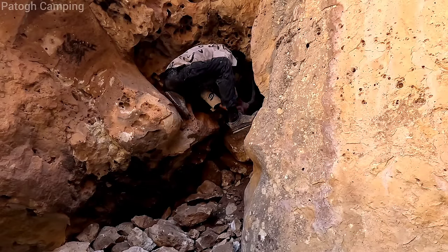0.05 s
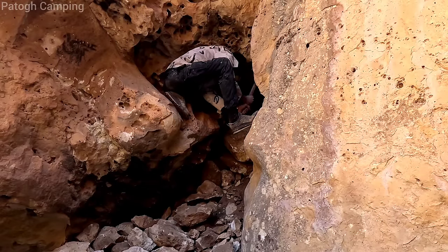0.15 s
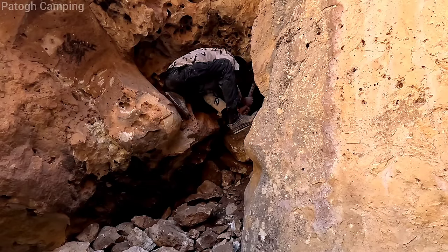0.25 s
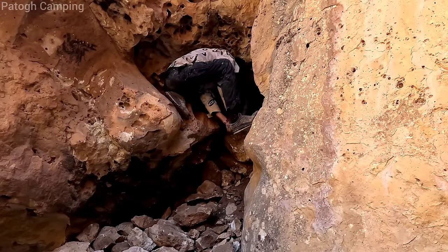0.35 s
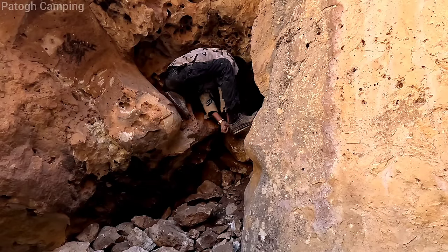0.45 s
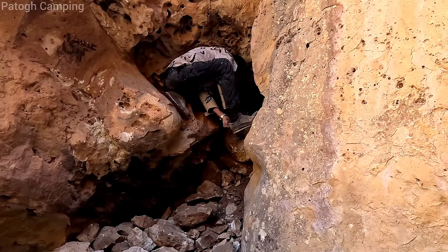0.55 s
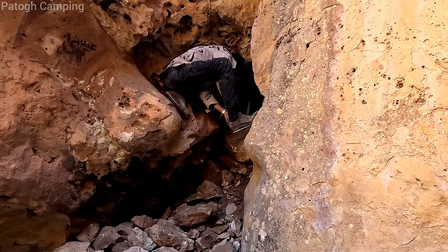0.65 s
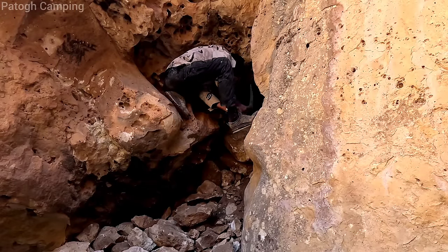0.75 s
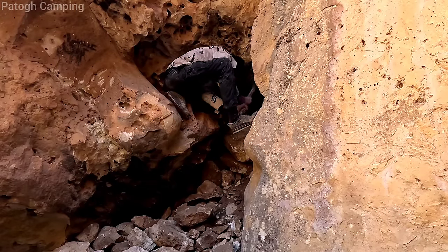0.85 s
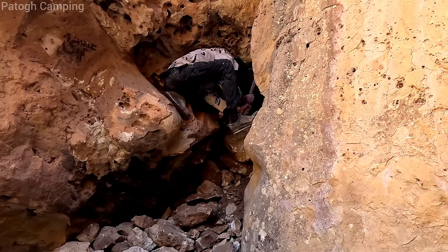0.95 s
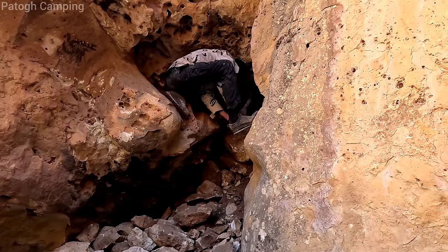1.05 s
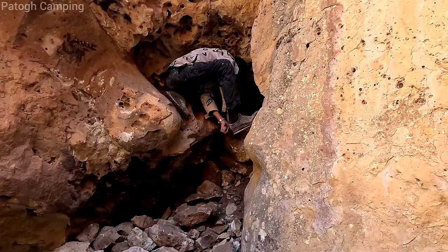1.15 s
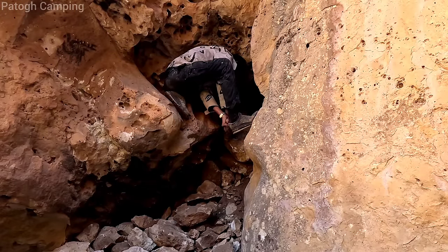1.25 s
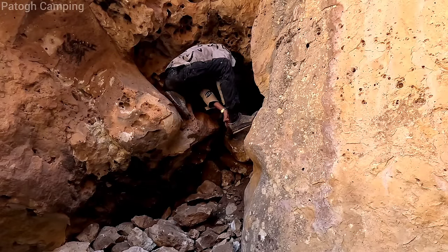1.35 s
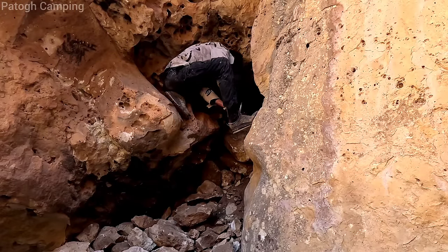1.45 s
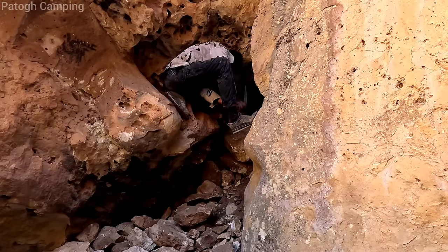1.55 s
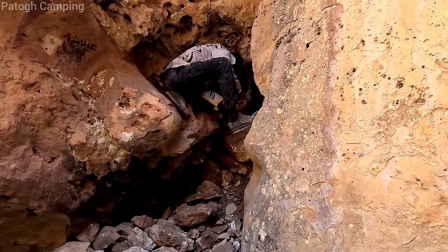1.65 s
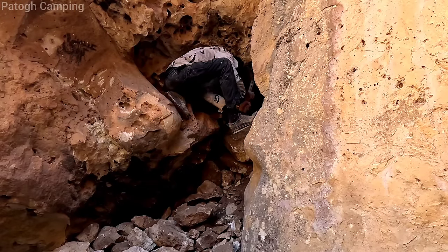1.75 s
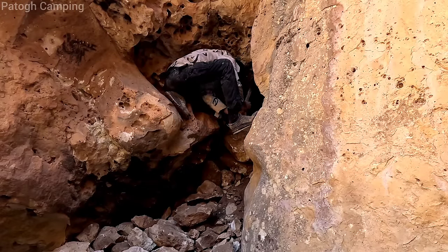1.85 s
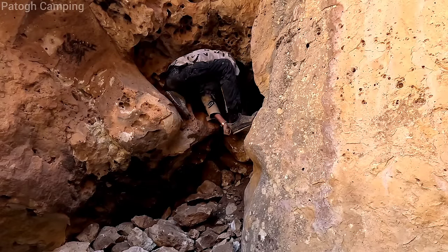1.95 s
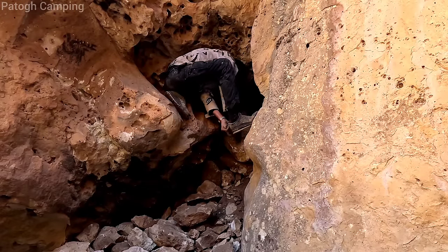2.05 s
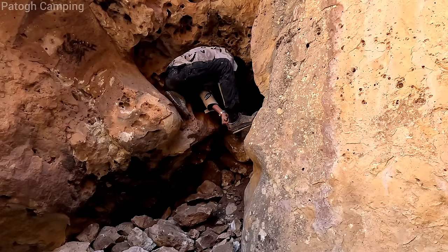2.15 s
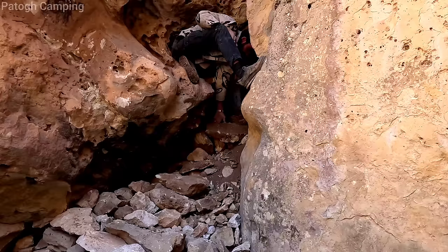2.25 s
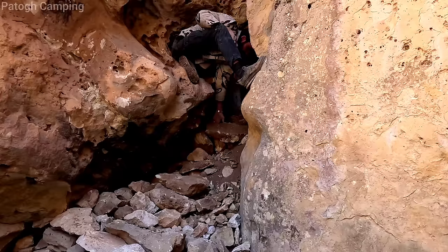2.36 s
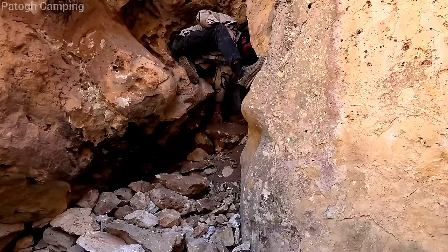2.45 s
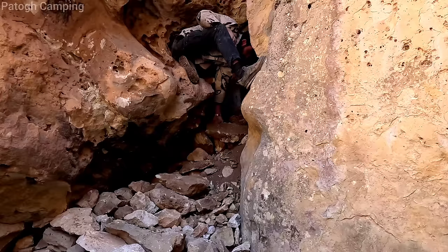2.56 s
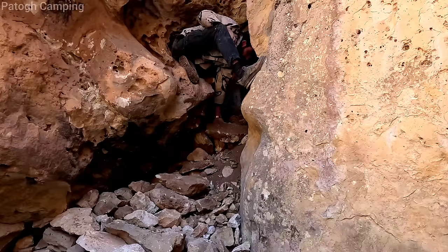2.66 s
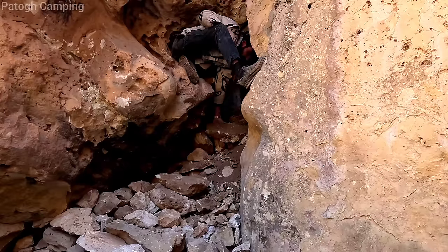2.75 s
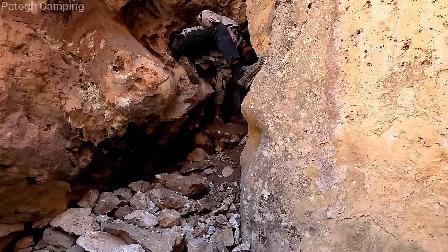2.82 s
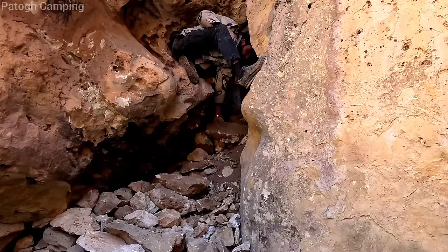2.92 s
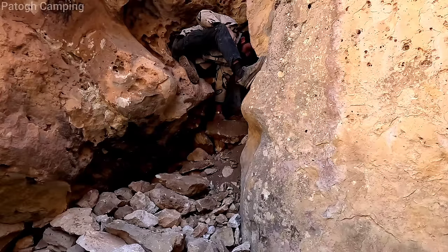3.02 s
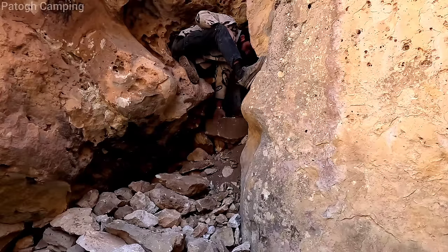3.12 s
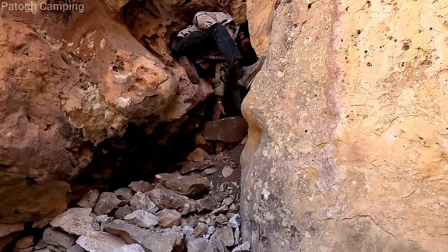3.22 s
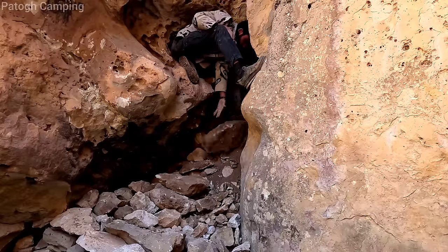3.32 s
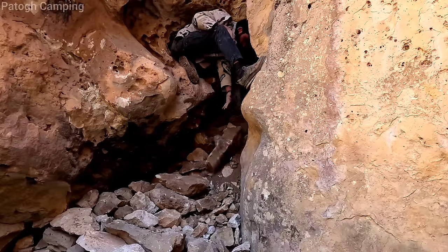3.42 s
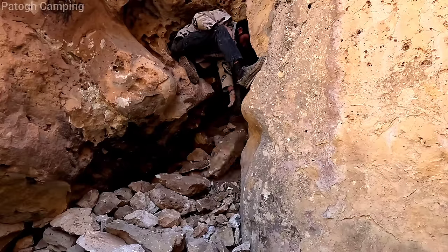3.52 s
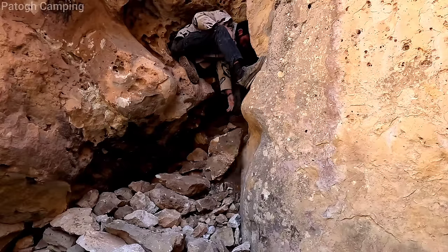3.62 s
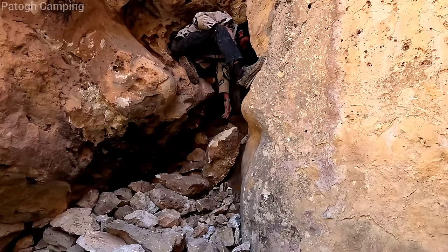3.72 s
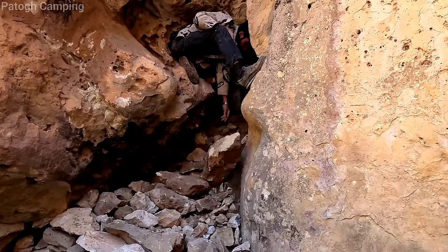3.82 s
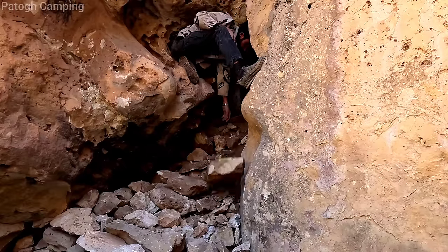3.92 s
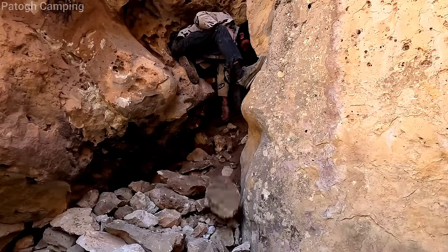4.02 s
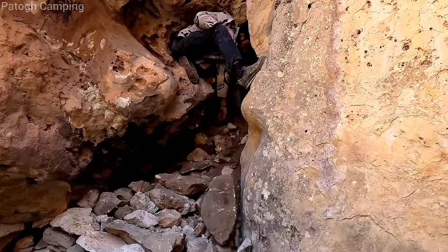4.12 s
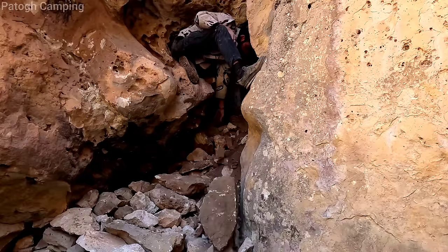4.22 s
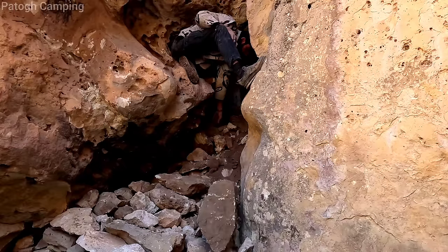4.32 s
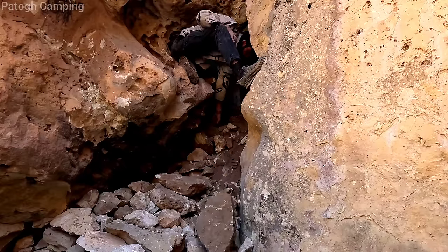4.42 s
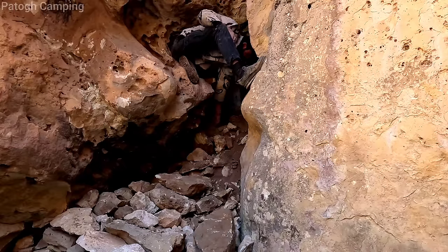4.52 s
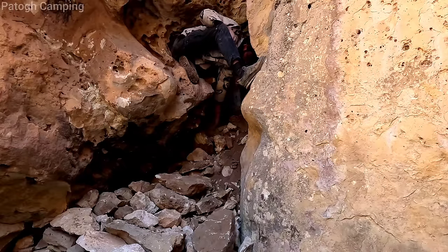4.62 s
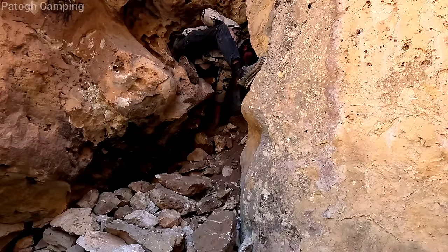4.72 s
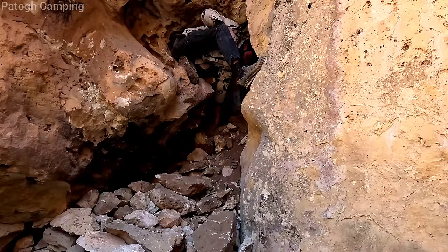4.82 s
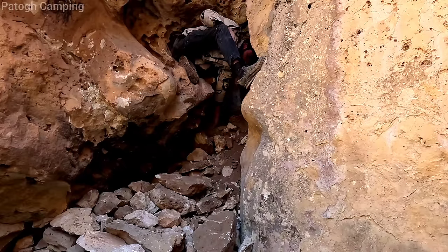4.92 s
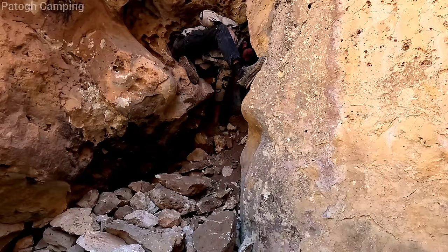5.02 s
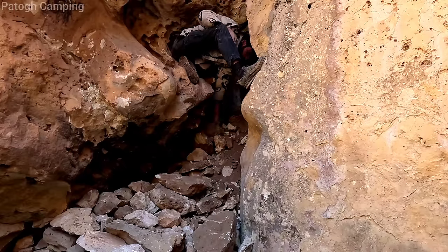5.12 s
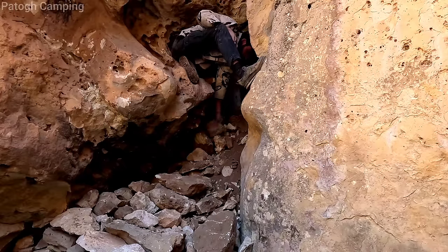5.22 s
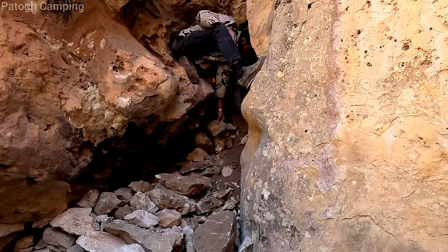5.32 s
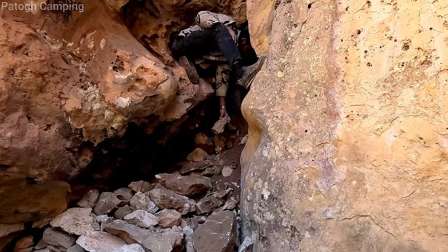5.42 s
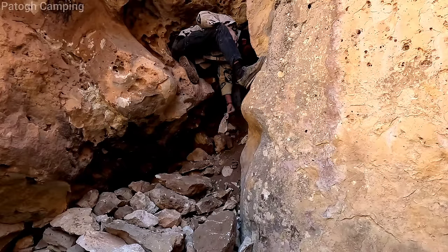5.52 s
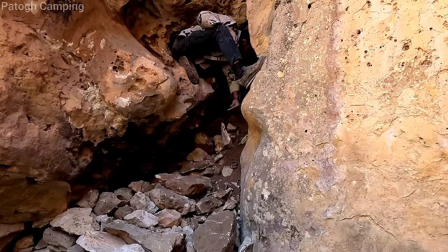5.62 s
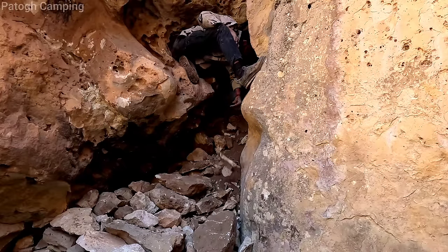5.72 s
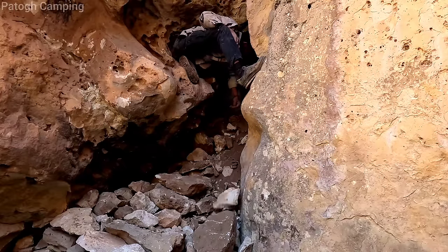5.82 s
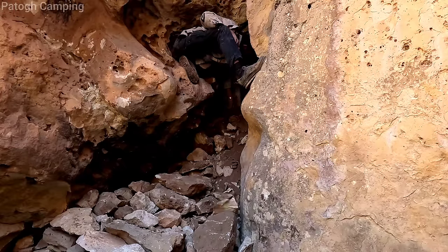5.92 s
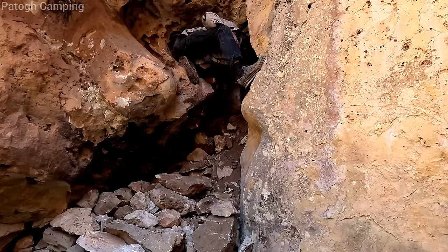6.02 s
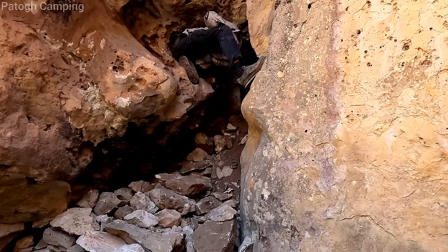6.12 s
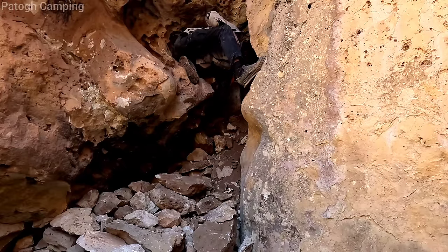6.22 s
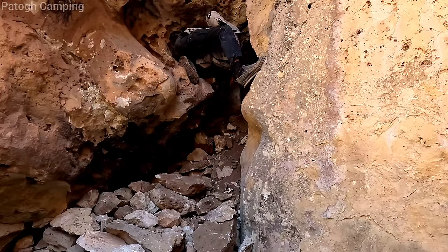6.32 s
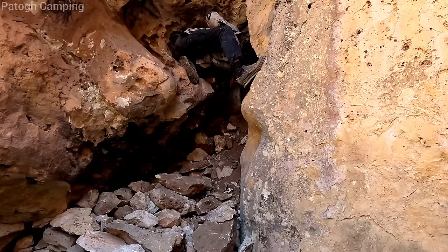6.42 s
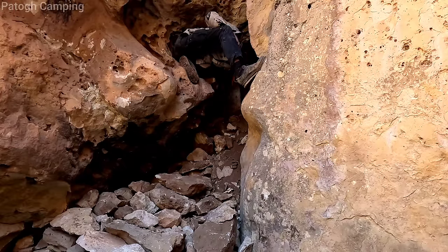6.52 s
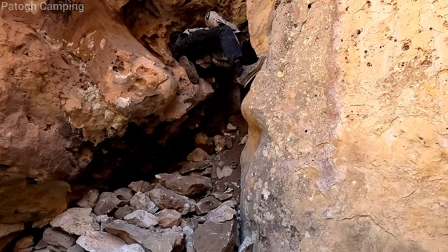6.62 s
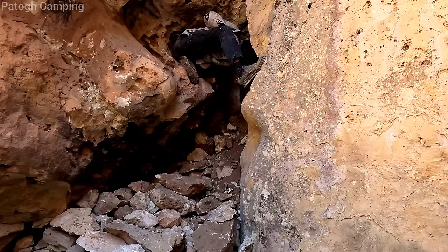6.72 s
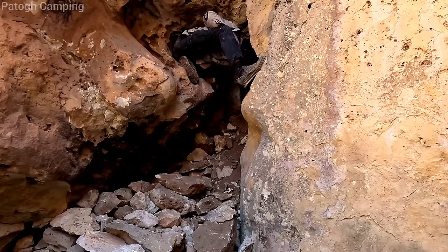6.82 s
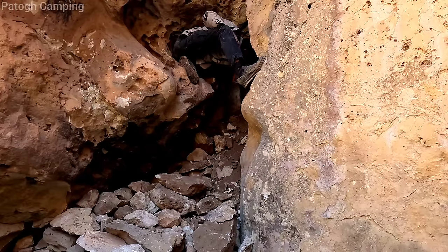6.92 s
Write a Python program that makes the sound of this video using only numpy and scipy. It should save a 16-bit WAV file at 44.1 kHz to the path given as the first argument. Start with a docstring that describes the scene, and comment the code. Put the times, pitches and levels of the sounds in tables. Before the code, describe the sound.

In an outdoor rock crevice with a short echo, three loud hammer blows hit stone at about 0.5, 1.2 and 2.1 seconds, each with a boom, splinters and a brief steel ring. A faint low drone underneath cuts off abruptly at 2.2 seconds, along with the last blow's tail. A lull follows with faint boot scuffs and cloth rustle. From 3.4 seconds stones tumble onto rubble, knocking and clattering most densely between 4.1 and 4.7 seconds, shaking gravel and sand loose. A hard slab scrapes softly around 5.2 seconds and clinks, then drops with a bright ring at 5.9 seconds. More stones clatter after it until about 6.2 seconds. Small scuffs and ticks of grit trail off by 6.8 seconds. Light wind rumbles on the microphone over a faint hiss, with low thumps around 3.5, 4.2 and 4.5 seconds.

```python
"""A sandstone crevice. Three hammer blows loosen a slab, each with a boom, splinters and a ring of steel.
Stones tumble onto the rubble, knocking and shaking gravel and sand loose; the hard slab scrapes free,
drops and rings, and more stones clatter after it. Boots scuff, cloth rustles and crumbs of grit tick.
The rock walls throw back a short echo. A light wind rumbles on the microphone over a faint hiss of air.
The sound breaks off at 2.2 s, cutting short a low drone and the last blow's tail."""
import sys
import numpy as np
from scipy import signal
from scipy.fft import rfft, irfft, next_fast_len
from scipy.io import wavfile
from scipy.ndimage import uniform_filter1d

SR = 44100
rng = np.random.default_rng(int(sys.argv[2]) if len(sys.argv) > 2 else 0)


def log_audio(samples):
    """Write samples as a 16-bit WAV file to the path given in sys.argv[1]."""
    # one column per channel
    frames = np.atleast_2d(samples).T
    # limit to full scale, then quantise
    limited = np.clip(frames, -1, 1)
    pcm = np.round(limited * 32767).astype(np.int16)
    wavfile.write(sys.argv[1], SR, pcm)


N = 307377
TIME = np.arange(N) / SR
AGE = np.arange(SR // 2) / SR   # time since a contact [s]
WALL_WIDTH = 0.4   # stereo spread of the reflections, side over mid

# stones landing: (time [s], level [dB], pitch [Hz], weight as extra thud [dB], hardness as treble [dB])
LANDINGS = [(3.434, -42.5, 2660, -10, 1), (3.451, -32, 1510, -20, 5.5), (3.467, -35.5, 1870, 3, 0),
            (3.482, -31.5, 1120, 1.5, 1), (3.554, -38.5, 1220, -1, 0.5), (3.623, -34.5, 530, -24, 11),
            (3.631, -40, 545, 13.5, -57), (3.709, -41.5, 1110, -2, 7.5), (3.771, -37, 1240, -2, 3),
            (3.804, -38.5, 970, -4, 1), (3.933, -38, 1164, -34, -2), (4.067, -30, 524, 6.5, -3),
            (4.11, -27.5, 842, -19.5, 3), (4.129, -23, 1690, -3.5, 2), (4.151, -22, 1067, 0, 3.5),
            (4.169, -26.5, 1080, -5, -4), (4.191, -30, 1020, -5, -2.5), (4.222, -32.5, 1120, -16, -5),
            (4.248, -33, 990, 5.5, -4), (4.275, -32.5, 1250, 10.5, -4.5), (4.295, -39.5, 1670, -1, 10),
            (4.311, -39.5, 1280, 8.5, -10), (4.345, -36.5, 1220, -19.5, 2), (4.39, -32, 970, 9.5, -8.5),
            (4.402, -39.5, 1120, -9, -16), (4.451, -27.5, 1073, -6, 0), (4.475, -30, 1100, 1, 1),
            (4.536, -22.5, 580, -18, -2.5), (4.559, -25, 1180, -4.5, 3.5), (4.576, -28, 847, 5, -2),
            (4.59, -22.5, 1142, -56, -12), (4.609, -28.5, 1170, -8, -4.5), (4.653, -29.5, 920, -48, 10),
            (4.672, -31, 1070, -20, -1.5), (4.695, -36, 3700, -9, 9.5), (4.715, -37, 1220, -7, 2),
            (4.77, -46, 970, -3, 6.5), (4.828, -48.5, 2970, -7.5, 6), (4.909, -48, 1182, -9, 5.5),
            (5.3152, -36.5, 1070, -15, 1.5), (5.402, -33, 2240, -43, 10), (5.668, -39.5, 1720, -8, 9.5),
            (5.731, -44, 1180, -10, 5), (5.781, -28.5, 2540, -62, -2), (5.8, -43.5, 2550, -12, 6),
            (5.869, -23.5, 1020, -14, -9), (5.9116, -21, 2650, -11.5, 7), (5.972, -34.5, 534, 3, -13),
            (6.041, -42.5, 850, -10, -7), (6.013, -36.5, 1380, -15, -7), (6.058, -35.5, 1030, -21, -23),
            (6.068, -27, 1084, -15, -22), (6.087, -33.5, 1615, -14, -30.5), (6.101, -33, 1080, -20, -19),
            (6.203, -27.5, 1855, -26.5, 5), (6.214, -25, 1220, -47, -21.5), (6.351, -51, 1175, -3, -28),
            (6.435, -52, 1200, -4.5, -15)]
# modes of the hard slab: (frequency [Hz], level [dB], t60 [s])
SLAB_MODES = [(3322, 7.5, 0.13), (3360, -19.5, .035), (3560, -19.5, .04), (5030, -22, .04),
              (5300, -10.5, 0.36), (6400, -30.5, .05), (7740, -14, 0.069)]


def from_db(db):
    """Decibels to gain."""
    return 10 ** (np.asarray(db) / 20)


def rms_one(x):
    """Scale to rms 1."""
    return x / np.sqrt(np.mean(x ** 2) + 1e-20)


def at_level(x, db):
    """Scale a hit so that its first 20 ms have this rms level."""
    return x * from_db(db) / np.sqrt(np.mean(x[..., :SR // 50] ** 2) + 1e-20)


def in_time(curve):
    """A breakpoint curve at every sample."""
    return np.interp(TIME, *np.transpose(curve))


def at_hz(points, hz, column=1):
    """Read one column of a spectrum on a log-frequency axis."""
    points = np.array(points)
    return np.interp(np.log(hz), np.log(points[:, 0]), points[:, column])


def band(x, low_hz, high_hz, order=2):
    """Causal band-pass."""
    sos = signal.butter(order, [low_hz, min(high_hz, SR / 2.1)], "band", fs=SR, output="sos")
    return signal.sosfilt(sos, x)


def fade(t60):
    """Exponential decay after a contact."""
    return np.exp(-np.log(1000) * AGE / t60)


def modes(table):
    """A struck body: damped sines of random polarity."""
    return sum(rng.choice([-1, 1]) * from_db(db) * fade(t60) * np.sin(2 * np.pi * hz * AGE)
               for hz, db, t60 in table)


def add(out, s, sound):
    """Mix a sound in at a time."""
    start = round(s * SR)
    out[:, start:start + sound.shape[-1]] += sound[..., :N - start]


def scatter(size, width):
    """Stereo noise, mostly alike on both sides."""
    mid, side = rng.standard_normal((2, size))
    return np.array([mid + width * side, mid - width * side])


def wander(size, smooth_s):
    """Smoothed random motion; rms 1."""
    return rms_one(uniform_filter1d(rng.standard_normal(size), round(smooth_s * SR)))


def chatter(depth_db=4.5, smooth_s=0.0017):
    """Uneven gain of a ringing body that keeps touching the rock."""
    return from_db(depth_db * wander(len(AGE), smooth_s))


def abrupt_cut(cut_s=2.198, fade_s=0.0041):
    """The sound breaks off at 2.2 s, cutting short the low drone and the last blow's tail."""
    return np.clip((cut_s - TIME) / fade_s, 0, 1)


def crevice(t60, direct_db, lumpy_db=2.0):
    """Response at one spot: the direct click, then uneven, fading wall reflections."""
    mid, side, lumps = rng.standard_normal((3, len(AGE)))
    # long waves reach both sides alike
    side = WALL_WIDTH * signal.lfilter(*signal.butter(1, 900, "high", fs=SR), side)
    lumps = np.repeat(lumps, SR // 1000)[:len(AGE)]   # a new level each millisecond
    walls = np.array([mid + side, mid - side]) * from_db(lumpy_db * lumps)
    walls *= fade(t60) + from_db(-35.5) * fade(0.085)
    walls /= np.sqrt(np.mean(np.sum(walls ** 2, axis=1)))
    walls[:, 0] += from_db(direct_db)
    return walls


def in_crevice(sound, t60, direct_db):
    """A dry sound heard among the rock walls."""
    return signal.fftconvolve(sound[None], crevice(t60, direct_db), axes=1)[:, :len(sound)]


def coloured_noise(spectrum, width):
    """Steady stereo noise with a given spectrum, rolled off beyond its ends; rms 1."""
    size = next_fast_len(N)
    hz = np.maximum(np.fft.rfftfreq(size, 1 / SR), 1)
    roll_off = (1 + (hz / spectrum[-1][0]) ** 8) * (1 + (spectrum[0][0] / hz) ** 4)
    gain = from_db(at_hz(spectrum, hz)) / roll_off
    return rms_one(irfft(rfft(scatter(N, width), size) * gain, size)[:, :N])


def grains(spectrum, per_s, spread_db, cycles, count=22):
    """Random contacts dealt to grains of many pitches, each ringing for some cycles; rms 1."""
    strengths = from_db(spread_db * np.minimum(rng.exponential(1, N), 4)) * rng.choice([-1, 1], N)
    clicks = strengths * (rng.random(N) < per_s / SR)
    dealt, out = rng.integers(0, count, N), 0
    for k, hz in enumerate(np.geomspace(spectrum[0][0], spectrum[-1][0], count)):
        radius, angle = from_db(-60 * hz / (cycles * SR)), 2 * np.pi * hz / SR
        contacts = clicks * (dealt == k) + 1e-12 * strengths
        ring = signal.lfilter([1, 0, -1], [1, -2 * radius * np.cos(angle), radius ** 2], contacts)
        out = out + from_db(at_hz(spectrum, hz)) * rms_one(ring)
    return rms_one(out)


def wind(gust_db=3.0, gust_s=0.071, split_hz=43, strong_db=-44):
    """Wind rumbles and thumps on the microphone; stronger wind has smaller eddies and sounds brighter."""
    # strength of the wind: (time [s], level [dB])
    strength = [(0.0, -59), (0.5, -65.5), (0.66, -44.5), (0.85, -58.5), (1.26, -50), (1.47, -61.5),
                (1.98, -67), (2.23, -49), (2.5, -61), (3.36, -35.5), (3.92, -46.5), (4.44, -41.5),
                (4.76, -51), (5.45, -67.5), (5.67, -67.5), (6.09, -44.5), (6.52, -59.5), (6.97, -72.5)]
    # spectrum of the rumble: (frequency [Hz], density [dB])
    colour = [(12, -36), (20, -2), (38, 1.5), (73, -5), (109, -20.5), (236, -37), (300, -44), (390, -83),
              (660, -120)]
    # single thumps: (centre time [s], peak [dB], frequency [Hz])
    buffets = [(2.451, -39, 30), (2.593, -44.5, 35.7), (2.667, -32, 33.2), (2.779, -40.5, 55.4),
               (2.942, -52, 60), (3.053, -31, 51.9), (3.409, -29, 111), (3.50, -23, 49.4),
               (4.19, -21, 44.7), (4.5, -21.5, 56.7)]
    # side the wind comes from: (time [s], left minus right [dB])
    balance = [(0.0, 3.5), (1.88, -1), (3.09, -5.5), (3.73, -4), (4.72, -3.5), (4.85, -3), (6.97, -3)]
    level_db = in_time(strength) + 0.5 + gust_db * wander(N, gust_s)
    eddies = coloured_noise(colour, width=0.23)
    large = signal.sosfiltfilt(signal.butter(2, split_hz, fs=SR, output="sos"), eddies)
    small = (eddies - large) * from_db(0.17 * (level_db - strong_db))
    out = from_db(level_db) * (large + small)
    for s, db, hz in buffets:   # an eddy sucks, then pushes
        turn = 2 * np.pi * hz * (TIME - s)
        out += from_db(db) * turn * np.exp(.5 * (1 - np.minimum(turn ** 2, 100)))
    return out * from_db(in_time(balance) * np.array([[.5], [-.5]]))


def drone(db=-56.5):
    """A low bed of noise that breaks off abruptly."""
    # spectrum of the drone: (frequency [Hz], density [dB])
    colour = [(90, -7.5), (150, -9), (220, -0.5), (280, -14.5), (360, -27), (500, -51.5)]
    return from_db(db) * abrupt_cut() * coloured_noise(colour, width=.1)


def air():
    """The faint hiss of still air."""
    # loudness of the hiss: (time [s], level [dB])
    loudness = [(0, -70.5), (2.7, -70.5), (2.95, -79), (3.2, -71), (6.6, -64), (6.97, -83)]
    # spectrum of the hiss: (frequency [Hz], density [dB])
    colour = [(200, 3.5), (350, -4), (550, -8.5), (800, -6.5), (1100, -7.5), (1420, -3), (2500, -11),
              (5000, -12), (7600, -11.5), (10000, -18.5), (15000, -38.5)]
    return from_db(in_time(loudness)) * coloured_noise(colour, width=0.22)


def scuffs(grain_db=6.0):
    """Boots and hands rub the rock: sand grains catch in quick succession under a swelling pressure."""
    # short rubs: (centre time [s], half length [s], level [dB], band frequency [Hz])
    rubs = [(0.107, 0.028, -63.5, 1990), (0.986, .006, -57, 4770), (1.737, 0.017, -61, 5300),
            (2.283, 0.031, -59, 790), (2.821, .013, -66, 2800), (3.11, 0.023, -63.5, 1840),
            (3.27, 0.014, -56.5, 2670), (3.385, 0.01, -52.5, 4000), (4.074, 0.012, -36.5, 6400),
            (5.469, 0.0059, -56, 7000), (6.184, 0.01, -55, 5600), (6.312, 0.013, -52.5, 1190),
            (6.381, 0.012, -47.5, 7000), (6.422, 0.013, -56.5, 4500)]
    out = np.zeros((2, N))
    for s, half_s, db, hz in rubs:
        catches = scatter(len(AGE), WALL_WIDTH) * from_db(grain_db * rng.standard_normal(len(AGE)))
        friction = rms_one(band(catches, hz / 2.22, hz * 1.5))
        pressure = np.exp(-.5 * (AGE / half_s - 2) ** 2) * np.minimum(2 * AGE / half_s, 1)
        add(out, s - 2 * half_s, from_db(db) * pressure * friction)
    return out


def crushed_rock(width=0.73):
    """Rock under the hammer: a burst of noise, each band with a crush, its own decay and a faint tail."""
    # response of the rock: (frequency [Hz], density [dB], t60 [s])
    response = [(60, -5.5, 0.18), (150, 4, 0.2), (410, 4, 0.23), (790, -0.5, 0.27), (1220, 4.5, 0.23),
                (1960, 3, 0.26), (2800, -3.5, 0.26), (4500, -13.5, 0.3), (7000, -18, 0.19),
                (8900, -21, 0.08), (10800, -32.5, .12), (15000, -36, .1)]
    edges_hz = np.geomspace(45, 15500, 22)
    white = rng.standard_normal((2, 2, len(AGE)))
    crush, tail = from_db(-1) * fade(0.11), from_db(-38) * fade(1.0)
    out = 0
    for k, (low, high) in enumerate(zip(edges_hz, edges_hz[1:])):
        hz = np.sqrt(low * high)
        mid, side = white[k % 2]
        spread = width * hz / (hz + 900)   # short waves scatter more widely
        noise = mid + spread * side * np.array([[1], [-1]])
        envelope = crush + fade(at_hz(response, hz, column=2)) + tail
        burst = rms_one(band(noise * envelope, low, high))
        out = out + burst * from_db(at_hz(response, hz)) * np.sqrt(high - low)
    return out


def hammer(echo_s=0.052, echo_db=-34.0):
    """Each blow hits the same spot, so the rock answers alike; splinters, clank and steel ring vary."""
    # blows: (time [s], body [dB], splinters [dB], splinter low cut [Hz], clank [dB], steel ring [dB])
    blows = [(0.4801, -15.5, -28, 420, -25.5, -36.5), (1.2092, -15, -25, 1800, -27, -36),
             (2.0538, -18, -26.5, 270, -28.5, -26.5)]
    # boom of the boulder and its hollow: (frequency [Hz], level [dB], t60 [s])
    boom_modes = [(38, -9, 0.11), (63, -9, 0.32), (131, -9, 0.083), (183, -10.5, 0.22), (320.2, -3, 0.067),
                  (567, -14, 0.26), (673, -9.5, 0.13), (948, -16, 0.095)]
    # ring of the chisel: (frequency [Hz], level [dB], t60 [s])
    steel_modes = [(4050, -4, 0.26), (3830, 0.5, .09), (4010, -2.5, 0.076), (6600, -18.5, .09),
                   (7760, -17.5, 0.11)]
    # clank of the struck block: (frequency [Hz], level [dB], t60 [s])
    clank_modes = [(1430, -8, .1), (1803, -3.5, 0.19), (1950, -2.5, 0.23), (2017, -0.5, 0.13),
                   (2390, -5.5, .16)]
    out = np.zeros((2, N))
    body = at_level(crushed_rock(), -2.2) + from_db(1.5) * modes(boom_modes)
    steel = in_crevice(modes(steel_modes), t60=0.13, direct_db=8.3)
    for s, db, splinter_db, splinter_hz, clank_db, steel_db in blows:
        splinters = band(crevice(0.16, -6.5, lumpy_db=3.5), splinter_hz, 7300, order=3)
        clank = in_crevice(modes(clank_modes), 0.17, 1.4) * chatter(depth_db=3.5, smooth_s=.002)
        ring = at_level(steel, steel_db) * chatter(depth_db=3.0)
        blow = from_db(db) * body + at_level(splinters, splinter_db) + at_level(clank, clank_db) + ring
        far_wall = at_level(band(crevice(0.27, -14.0), 400, 4500), db + echo_db)
        echo = np.pad(far_wall, ((0, 0), (round(echo_s * SR), 0)))[:, :len(AGE)]
        add(out, s, blow + echo)
    return out * abrupt_cut()


def grit():
    """Single crumbs of grit snap or drop with a tick."""
    # crumbs: (time [s], peak [dB])
    crumbs = [(0.7783, -41), (2.0248, -36), (2.225, -48.5), (2.5082, -45), (2.6586, -51), (4.787, -30.5),
              (4.8926, -36), (4.983, -34.5), (5.0708, -39), (6.485, -35.5), (6.5318, -40), (6.5855, -38),
              (6.7627, -42.5)]
    out = np.zeros((2, N))
    for s, db in crumbs:
        tick = band(crevice(0.11, -7.5), 1000, 7700)
        add(out, s, from_db(db) * tick / np.abs(tick).max())
    return out


def cloth():
    """Folds of cloth catch and slip in uneven grains; each movement swells and fades."""
    # body movements while gripping the slab: (centre time [s], half length [s], level [dB])
    moves = [(1.903, 0.13, -71), (2.32, 0.08, -63.5), (2.683, 0.097, -66.5), (3.304, 0.09, -61)]
    # tone of the fabric: (frequency [Hz], level [dB])
    colour = [(350, 3), (900, -22.5), (1450, 4.5), (2500, -3.5), (3500, -0.5), (6000, 4.5), (9000, -1.5)]
    effort = sum(from_db(db) * np.exp(-.5 * ((TIME - s) / half_s) ** 2) for s, half_s, db in moves)
    folds = effort * grains(colour, per_s=960, spread_db=6.0, cycles=20.0, count=16)
    return from_db(-1.0) * in_crevice(folds, t60=0.075, direct_db=-9.0)


def heap_shaking(rise_s=.008, settle_t60=0.42):
    """Envelope of the heap's motion: each landing jolts it, a heavy stone more, then it settles."""
    power = np.zeros((1, N))
    jolt = np.minimum(AGE / rise_s, 1) * fade(settle_t60)
    for s, db, _, weight_db, _ in LANDINGS:
        add(power, s, (from_db(db + 0.33 * weight_db) * jolt) ** 2)
    return np.sqrt(power[0])


def rubble(full_flow_db=-53.5):
    """Gravel grinds and sand hisses, driven by a running trickle and by the shaking of the heap."""
    # trickle of the loosened rubble: (time [s], level [dB])
    trickle = [(3.0, -82), (3.36, -73.5), (3.62, -55.5), (4.03, -54.5), (4.27, -51), (4.61, -46),
               (4.9, -64.5), (5.31, -60), (5.51, -70), (5.74, -67), (5.89, -56.5), (6.06, -54.5),
               (6.16, -70), (6.55, -74), (6.84, -87.5), (6.97, -95)]
    # tone of the gravel: (frequency [Hz], level [dB])
    gravel_colour = [(160, 1), (300, -2), (600, -10.5), (1100, 5), (1800, 4), (3000, -17.5)]
    # tone of the sand: (frequency [Hz], level [dB])
    sand_colour = [(2800, 7.5), (5000, 0.5), (8000, 8), (9500, -35), (11500, -39), (14500, -29)]
    shaken, trickle_db = heap_shaking(), in_time(trickle)
    creep_db = full_flow_db + 1.45 * (trickle_db - full_flow_db)   # gravel needs a strong flow to move
    gravel_flow = np.hypot(from_db(-6) * shaken, from_db(creep_db + 8.5))
    sand_flow = np.hypot(from_db(-31) * shaken, from_db(trickle_db + 2))
    gravel = gravel_flow * grains(gravel_colour, per_s=1600, spread_db=5.0, cycles=13.0)
    sand = sand_flow * grains(sand_colour, per_s=1900, spread_db=8.0, cycles=26.0)
    loose = TIME > trickle[0][0]
    return from_db(-2.0) * in_crevice((gravel + sand) * loose, t60=0.081, direct_db=-2.2)


def stones(ring_cycles=36.4, overtone=1.62, hollow_ratio=1.36):
    """Stones land with a noisy contact, a hollow note and a short ring; light landings ring freely."""
    # thud, knock, clack and crack of a contact:
    # (low edge [Hz], high edge [Hz], t60 [s], level [dB], share of weight, share of hardness)
    voices = [(47.4, 338, 0.19, -3, 1, 0), (420, 1550, 0.11, -1.5, 0.13, 0),
              (1315, 3700, 0.11, -6, 0.14, 0.83), (4000, 8270, 0.12, -12, 0.42, 1.4)]
    out = np.zeros((2, N))
    for s, db, hz, weight_db, hard_db in LANDINGS:
        attack_db = -11.5 + 0.43 * hard_db   # a hard contact is sharper
        for low, high, t60, voice_db, by_weight, by_hardness in voices:
            contact = band(crevice(t60, attack_db), low, high, order=3)
            add(out, s, at_level(contact, db + voice_db + by_weight * weight_db + by_hardness * hard_db))
        hollow = band(crevice(0.15, -7.5), hz / hollow_ratio, hz * hollow_ratio)
        add(out, s, at_level(hollow, db - 9.5))
        ring_t60 = ring_cycles / hz
        ring = modes([(hz, 0, ring_t60), (hz * overtone, -18.0, ring_t60 / overtone)])
        ring_db = db - 2.5 - 0.15 * hard_db - 0.023 * weight_db
        add(out, s, at_level(in_crevice(ring, 0.13, 0.73), ring_db))
    return out


def chips(twin_ratio=1.045, ring_t60=.03):
    """Small chips snap and clink; their uneven shape gives them two close modes."""
    # clinks: (time [s], pitch [Hz], level [dB])
    clinks = [(3.53, 4850, -43), (3.749, 5750, -43.5), (3.749, 7520, -43), (3.773, 6580, -46),
              (3.974, 5750, -50.5), (4.224, 5400, -40.5), (4.256, 5530, -46), (4.296, 7600, -43.5),
              (4.686, 5480, -42.5), (5.912, 5900, -35), (6.012, 5080, -42), (6.013, 5750, -41.5),
              (6.068, 5200, -45)]
    out = np.zeros((2, N))
    for s, hz, db in clinks:
        twins = modes([(hz, 0, ring_t60), (hz * twin_ratio, -6.5, ring_t60)])
        ring = in_crevice(twins, t60=.16, direct_db=1.1)
        snap = band(crevice(0.073, 0.0), hz / 1.4, hz * 1.8)
        add(out, s, at_level(ring, db + 4.0) + at_level(snap, db - 9.5))
    return out


def slab_hits():
    """The hard slab drops: its edge snaps and it rings longer than the soft sandstone."""
    # impacts: (time [s], ring [dB], edge snap [dB])
    hits = [(5.095, -47.5, -65), (5.314, -33, -56), (5.87, -22.5, -25.5), (5.9127, -36, -46.5),
            (6.012, -40.5, -45.5), (6.069, -60, -45.5)]
    out = np.zeros((2, N))
    for s, ring_db, snap_db in hits:
        snap = band(crevice(0.11, -3.0), 4200, 9350, order=4)
        ring = in_crevice(modes(SLAB_MODES), 0.097, 2.7) * chatter()
        add(out, s, at_level(snap, snap_db) + at_level(ring, ring_db))
    return out


def slab_drag(start_s=5.15, end_s=5.295, edge_s=0.0067, slips_per_s=160, spread_db=5.0):
    """The dragged slab sticks and slips at an uneven pace, and each slip sets it ringing."""
    slipping = rng.random(N) < slips_per_s / SR
    slips = slipping * from_db(spread_db * rng.standard_normal(N)) * rng.choice([-1, 1], N)
    damped_slab = modes(SLAB_MODES) * fade(.09)   # lying on the rock shortens its ring
    ring = rms_one(signal.fftconvolve(slips, damped_slab)[:N])
    scrape = from_db(-7.0) * rms_one(band(slips, 1500, 8400, order=4))
    push = np.clip((TIME - start_s) / edge_s, 0, 1) * np.clip((end_s - TIME) / edge_s, 0, 1)
    return from_db(-54.5) * in_crevice((ring + scrape) * push, t60=0.084, direct_db=-2.5)


def scene():
    """The rock work, the small movements and the outdoor bed, mixed in stereo."""
    rock_work = hammer() + stones() + slab_hits() + chips() + slab_drag()
    return rock_work + grit() + scuffs() + cloth() + rubble() + drone() + air() + wind()


def record(dry, left_lag_s=1.5e-5, right_shade_hz=11500, cutoff_hz=15700):
    """The left side hears a moment later, the right a little duller; peaks are rounded, the top is cut."""
    # treble response of the microphone: (frequency [Hz], gain [dB])
    treble = [(6000, 0), (8800, 1.5), (9800, -2.5), (12500, -1.5), (15500, -6.5)]
    size = next_fast_len(N + 100)
    hz = np.fft.rfftfreq(size, 1 / SR)
    left = np.exp(-2j * np.pi * hz * left_lag_s)
    right = 1 / np.sqrt(1 + (hz / right_shade_hz) ** 4)
    response = np.array([left, right]) * from_db(at_hz(treble, np.maximum(hz, 1)))
    heard = irfft(rfft(dry, size) * response, size)[:, :N]
    return signal.sosfilt(signal.cheby2(14, 60, cutoff_hz, fs=SR, output="sos"), np.tanh(heard))


dry = scene()
out = record(dry)
log_audio(out)
```